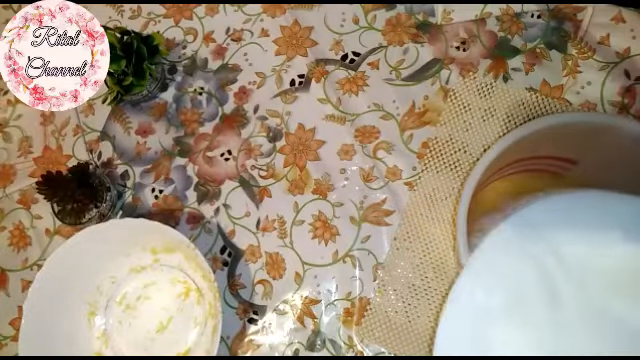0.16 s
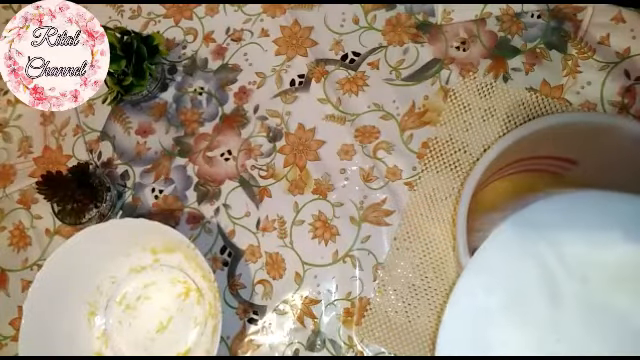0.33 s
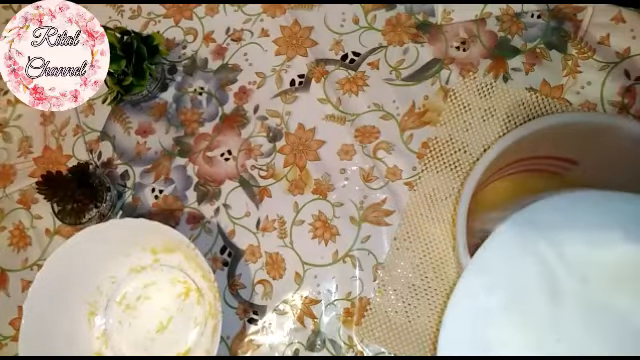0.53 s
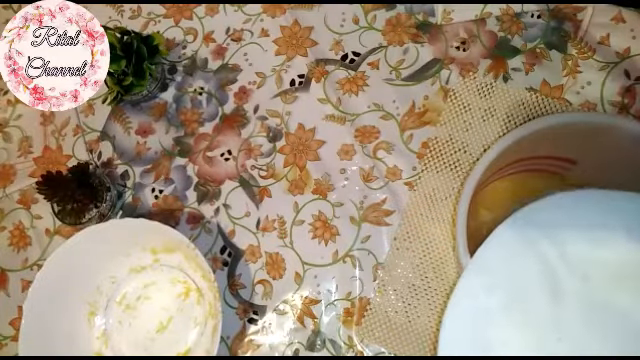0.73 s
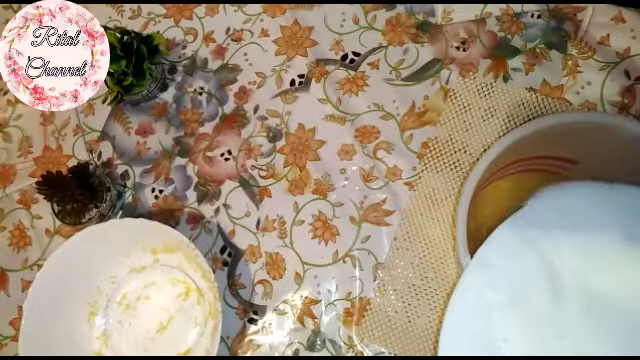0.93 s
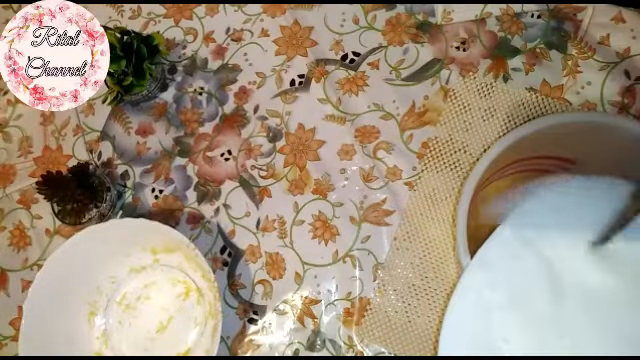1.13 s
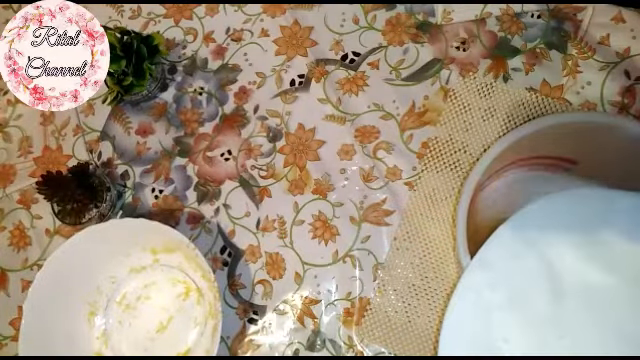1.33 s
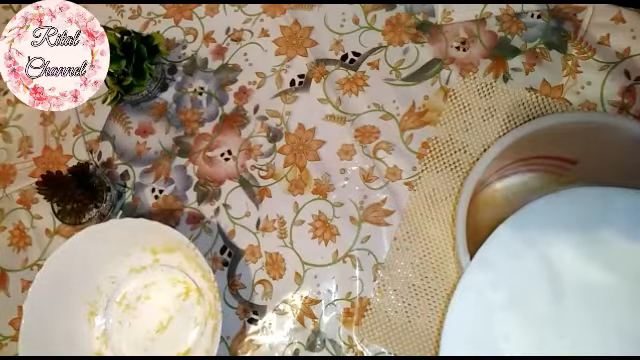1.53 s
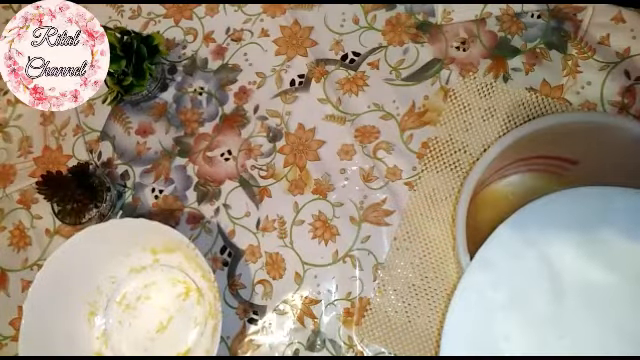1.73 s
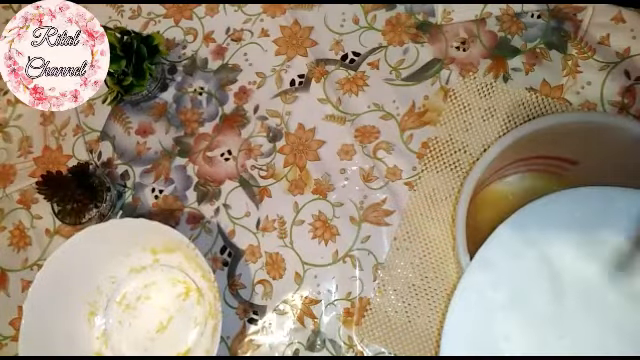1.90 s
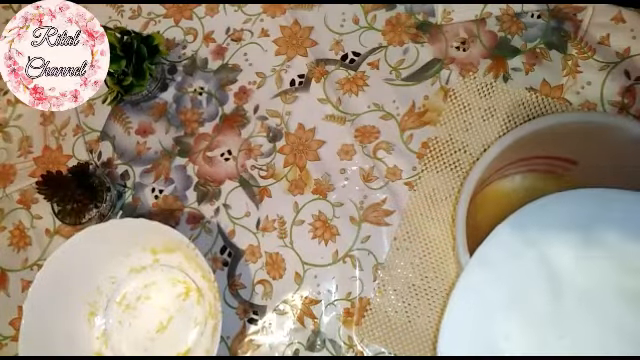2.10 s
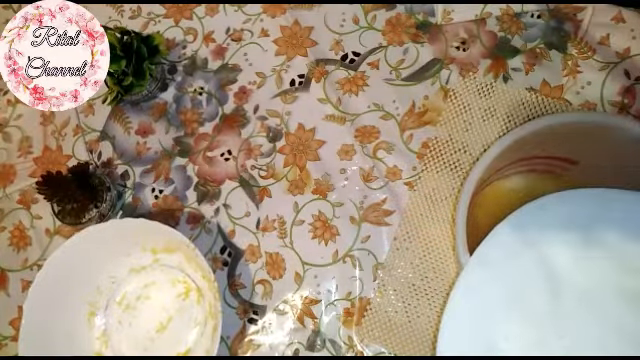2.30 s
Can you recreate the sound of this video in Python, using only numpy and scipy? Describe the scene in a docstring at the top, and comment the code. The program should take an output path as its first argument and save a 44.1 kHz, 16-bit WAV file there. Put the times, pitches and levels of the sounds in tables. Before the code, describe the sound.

Close stereo pickup of sugar sliding from a bowl into a plastic bucket: a thin bright hiss first, then fuller rushes with crunching clumps, low spoon knocks and scrapes, in a small room with very faint hum.

```python
"""A fine hiss of sugar opens the scene, sliding from a bowl into a plastic bucket near two microphones.
Coloured noise and random clicks make the hiss and the coarser rustle; clumps crunch as short bursts.
A spoon knocks and scrapes the bowl, whose wall rings low as a bank of decaying sines with room tails.
A wavering sine and filtered noise make a faint motor hum and room rumble; the hiss dies away near the end."""
import sys
import numpy as np
from scipy import signal
from scipy.fft import rfft, irfft
from scipy.io import wavfile
from scipy.ndimage import uniform_filter1d

SR = 44100
rng = np.random.default_rng(int(sys.argv[2]) if len(sys.argv) > 2 else 0)


def store_pcm(level_fs):
    """Save levels as 16-bit WAV."""
    pcm = np.round(np.clip(level_fs, -1, 1) * 32767).astype(np.int16)
    wavfile.write(sys.argv[1], SR, np.atleast_2d(pcm).T)


N = 103635  # samples, 2.35 s


def gain_of(db):
    """Decibels to amplitude gain; twice the decibels gives power."""
    return 10 ** (np.asarray(db) / 20)


def evened(x):
    """Scales to rms 1."""
    return x / np.sqrt(np.mean(x ** 2) + 1e-20)


def curve(rows, order=1):
    """One column of a time table, interpolated at every sample."""
    rows = np.array(rows)
    return np.interp(np.arange(N) / SR, rows[:, 0], rows[:, order])


def read(points, hz):
    """A spectrum table at the given frequencies, interpolated over log frequency."""
    f, value = np.transpose(points)
    return np.interp(np.log(hz + 1), np.log(f + 1), value)


# colour of the two microphones: (frequency [Hz], left minus right [dB])
MIC_COLOUR = [(2000, 1), (4000, 0.5), (6000, -0.5), (7200, -4.5), (8000, 9.5), (9000, 12.5), (11500, 6.5),
              (14000, 16)]


def coloured(x, spectrum, patchy_db=0.):
    """Gives a stereo pair a spectrum, the microphones' colours and drifting patches; rms 1."""
    hz, _, z = signal.stft(x, SR, nperseg=512)
    patches = rng.standard_normal(z.shape)
    for _ in range(2):
        patches = uniform_filter1d(patches, 5 if _ == 0 else 6, 1 if _ == 0 else 2)
    db = read(spectrum, hz) + np.outer([.5, -.5], read(MIC_COLOUR, hz))
    gain = gain_of(db[:, :, None] + patchy_db * evened(patches))
    return evened(signal.istft(z * gain, SR, nperseg=512)[1][:, :N])


RIGHT_LAG_S = 0.00019


def pair(a, b, same):
    """Left and right from two signals; the shared part reaches the right a little later."""
    same = np.clip(same, 0, 1)
    late = np.roll(a, round(RIGHT_LAG_S * SR))
    return np.array([a, same * late + np.sqrt(1 - same ** 2) * b])


def clicks(per_s, spread_db):
    """Sparse clicks of random sign, a few of them large; rms 1."""
    size = gain_of(spread_db * np.minimum(rng.exponential(1, N), 5))
    size = size * rng.choice([-1., 1.], N)
    return evened(size * (rng.random(N) < per_s / SR))


def add(mix, s, sound):
    """Mixes a sound in at a time in seconds."""
    part = mix[..., round(s * SR):][..., :sound.shape[-1]]
    part += sound[..., :part.shape[-1]]


GRAIN_SHARE, GRAIN_SAME = .25, .5  # power in separate grains; their left-right likeness
FLICKER_DB = 1.33  # rms


def grains(same, hits):
    """A dense wash with separate grains on top, flickering as the stream bunches."""
    a, b = np.sqrt(1 - GRAIN_SHARE) * rng.standard_normal((2, N))
    flicker = rng.standard_normal(N)
    for _ in range(2):
        flicker = uniform_filter1d(flicker, size=150)
    mixed = pair(a, b, same) + np.sqrt(GRAIN_SHARE) * pair(*hits, GRAIN_SAME)
    return mixed * gain_of(FLICKER_DB * evened(flicker))


# sugar flow: (time [s], fine hiss level [dB], lower rustle level [dB])
FLOW_LEVELS = [(0, -49.5, -68.5), (.05, -53.5, -65.5), (.28, -47.5, -53.5), (.44, -47, -57),
               (.56, -49, -57.5), (.64, -57, -67.5), (.7, -55, -69), (.86, -53.5, -76.5),
               (.9, -47.5, -54.5), (.96, -55, -67.5), (1.06, -54.5, -60), (1.14, -48.5, -62),
               (1.22, -43.5, -46.5), (1.3, -47, -59), (1.4, -38.5, -53.5), (1.47, -39, -52),
               (1.55, -53.5, -64), (1.62, -51.5, -66), (1.67, -49.5, -56.5), (1.735, -69, -71),
               (1.75, -51, -53.5), (1.83, -54, -65), (1.86, -48.5, -52), (1.96, -63.5, -71),
               (1.98, -52.5, -59.5), (2.065, -50.5, -55.5), (2.11, -71, -74), (2.26, -93, -98),
               (2.32, -88, -91.5), (2.324, -71, -93)]
# colour of the fine hiss: (frequency [Hz], relative level [dB])
HISS_COLOUR = [(2600, -70), (3500, -40), (4270, -30.5), (6110, -13), (6920, 0.5), (8650, 3), (10200, -7),
               (14000, -17), (14400, -60.5)]
# colour of the lower rustle: (frequency [Hz], relative level [dB])
RUSTLE_COLOUR = [(1100, -57.5), (1600, -11.5), (2050, -3.5), (2860, -2), (3680, -7.5), (4270, -6),
                 (5600, -3.5), (6500, -2), (8450, -56)]
GRAINS_PER_S, GRAIN_SPREAD_DB, PATCHY_DB = 2500, 3.5, 2
HISS_SAME, RUSTLE_SAME = 0.05, 0.19  # left-right likeness of each wash


def sugar():
    """The stream: the same grains heard as fine hiss, lower rustle and coarse sliding."""
    hits = [clicks(GRAINS_PER_S, GRAIN_SPREAD_DB) for _ in "lr"]
    fine = coloured(grains(HISS_SAME, hits), HISS_COLOUR, PATCHY_DB)
    low = coloured(grains(RUSTLE_SAME, hits), RUSTLE_COLOUR, PATCHY_DB)
    fine_power = gain_of(2 * curve(FLOW_LEVELS))
    low_power = gain_of(2 * curve(FLOW_LEVELS, order=2))
    add_crunches(fine_power, low_power)
    return fine * np.sqrt(fine_power) + low * np.sqrt(low_power) + coarse_slide(hits)


# crunching clumps: (time [s], hiss level [dB], rustle relative to hiss [dB], decay t60 [s])
CLUMPS = [(0.6629, -47.5, -4.5, 0.033), (0.72, -44.5, -23, 0.048), (0.8757, -44, -3.5, 0.023),
          (0.8941, -31, -17, 0.036), (1.034, -35.5, -7, 0.023), (1.1683, -36.5, -37, 0.06),
          (1.2006, -40, 0, 0.021), (1.2205, -33, 3, 0.0079), (1.5715, -30, -42, 0.019),
          (1.6381, -37, -3.5, 0.039), (1.686, -36, -7.5, 0.013), (1.7466, -28.5, -13.5, 0.014),
          (1.779, -38.5, -13, 0.04), (1.9718, -46.5, -4.5, 0.059)]
CRUNCH_RISE_S = .0012


def add_crunches(fine_power, low_power):
    """Clumps crunch: short bursts of power swell the hiss and the rustle, then die away."""
    t = np.arange(6000) / SR
    for s, db, low_db, t60 in CLUMPS:
        burst = np.minimum(t / CRUNCH_RISE_S, 1) * gain_of(2 * (db - 60 * t / t60))
        add(fine_power, s, burst)
        add(low_power, s, burst * gain_of(2 * low_db))


# colour of coarse sliding on the wall: (frequency [Hz], relative level [dB])
ROUGH_COLOUR = [(800, -49.5), (1200, 6), (1600, 2.5), (2050, 9.5), (2600, -7.5), (3100, -34.5)]
# coarse sliding: (time [s], level [dB])
SLIDE_LEVELS = [(1.15, -89), (1.22, -54), (1.32, -68.5), (1.42, -51.5), (1.52, -59), (1.62, -77.5),
                (1.78, -65.5), (1.95, -82), (2.0, -51), (2.075, -56), (2.1, -69.5), (2.26, -97)]


def coarse_slide(hits):
    """Coarse sliding on the wall: the grain noise in a narrower, lower colour."""
    rough = coloured(grains(RUSTLE_SAME, hits), ROUGH_COLOUR, PATCHY_DB)
    return rough * gain_of(curve(SLIDE_LEVELS))


# single lump landing: (time [s], level [dB], frequency [Hz])
LUMPS = [(0.2873, -32.5, 2230)]
TICK_S = 0.00029  # standard deviation of the bell


def ticks():
    """A lump landing: a very short tone under a bell-shaped envelope."""
    out, t = np.zeros(N), np.arange(-100, 100) / SR
    for s, db, hz in LUMPS:
        bell = np.exp(-.5 * (t / TICK_S) ** 2)
        add(out, s + t[0], gain_of(db) * bell * np.cos(2 * np.pi * hz * t))
    return out


# bowl wall modes, before a strike shifts and shapes them:
# (frequency at main mode 404 Hz [Hz], relative level [dB], t60 at length factor 1 [s])
WALL_MODES = [(270, -13, .07), (325, -8, .09), (403, 0, .2), (455, -12, .09), (550, -7, .13),
              (612, -5, .12), (690, -10, .14), (765, -18, .12), (900, -22, .1), (1040, -13, .08),
              (1078, -10, .11), (1225, -16, .14)]
MAIN_HZ, MIDDLE_FROM_HZ, UPPER_FROM_HZ = 404, 500, 850
THUD_DB, THUD_SHORTER = 5, 0.23  # each mode starts with a quickly damped surplus
KNOCK_RISE_S = .002


def ring(main_hz, middle_db, upper_db, length, scatter_db):
    """The bowl wall struck once: grip and load shift its pitch and favour some modes."""
    hz, db, t60 = np.transpose(WALL_MODES)[:, :, None]
    t = np.arange(8000) / SR
    balance_db = np.where(hz > UPPER_FROM_HZ, upper_db, middle_db * (hz > MIDDLE_FROM_HZ))
    level = gain_of(db + balance_db + scatter_db[:, None])
    fall = gain_of(-60 * t / (t60 * length))
    thud = gain_of(THUD_DB - 60 * t / (t60 * THUD_SHORTER))
    rise = np.sin(np.pi / 2 * np.minimum(t / KNOCK_RISE_S, 1)) ** 2
    modes = np.sin(2 * np.pi * hz * main_hz / MAIN_HZ * t)
    return rise * (level * (fall + thud) * modes).sum(0)


# knocks on the bowl: (time [s], level [dB], main mode [Hz], middle modes [dB], upper modes [dB],
# ring length [factor])
BOWL_KNOCKS = [(0.72, -47.5, 435, -4, 3.5, 0.31), (.792, -53.5, 332, -10, -10, 0.57),
               (.815, -53.5, 433, -10, -10, 0.34), (.867, -56.5, 400, -13, -10, 0.41),
               (.879, -44, 398, 1, 0, 0.1), (.896, -51, 428.5, -23, 4, 0.77),
               (.99, -50, 427, -16, -4, 0.23), (1.027, -55.5, 408, -10, -7, 1),
               (1.034, -40, 398.4, -0.5, -5, 0.9), (1.051, -48.5, 401, -14, -21, 0.45),
               (1.089, -51, 390.6, -21, -31, 0.88), (1.181, -47, 425, -1, -6, 0.31),
               (1.194, -40.5, 405.6, -11, -7.5, 1), (1.221, -49.5, 398, 8, 6, 0.89),
               (1.638, -30, 402, 1.5, 3.5, 0.26), (1.685, -41, 415, -9, 0.5, 0.17),
               (1.745, -54.5, 419, 6.5, 11, 0.66), (1.77, -65, 403, 8, 11, 0.63),
               (1.896, -70, 408, 11.5, 22, 0.76), (1.973, -51.5, 455, -1, 11.5, 0.47)]
SCATTER_DB = 2.5  # chance difference of each mode at each knock


def knocks():
    """Spoon knocks: each strike rings the wall with its own pitch, balance and length."""
    out = np.zeros(N)
    chance = rng.standard_normal((len(BOWL_KNOCKS), len(WALL_MODES)))
    for (s, db, *colour), draw in zip(BOWL_KNOCKS, chance):
        add(out, s, gain_of(db) * ring(*colour, SCATTER_DB * draw))
    return out


# spoon dragging on the wall: (time [s], level [dB])
SCRAPE_LEVELS = [(.7, -120), (.74, -68.5), (.85, -65), (.9, -52), (.96, -62), (1.09, -66), (1.16, -70),
                 (1.24, -54.5), (1.36, -69.5), (1.45, -87), (1.62, -99), (1.67, -52.5), (1.735, -61),
                 (1.78, -54), (1.87, -69), (1.95, -81), (2.0, -56.5), (2.07, -70.5), (2.14, -105.5)]
SLIPS_PER_S, SLIP_SPREAD_DB = 470, 2
SLIP_MIDDLE_DB, SLIP_UPPER_DB, SLIP_LENGTH = 3, 6.5, 0.28  # balance and ring length factor


def scrape():
    """The dragging spoon: a train of small random slips, each ringing the same wall briefly."""
    slips = clicks(SLIPS_PER_S, SLIP_SPREAD_DB) * gain_of(curve(SCRAPE_LEVELS))
    slip = ring(MAIN_HZ, SLIP_MIDDLE_DB, SLIP_UPPER_DB, SLIP_LENGTH, np.zeros(len(WALL_MODES)))
    return signal.oaconvolve(slips, slip / np.linalg.norm(slip))[:N]


WALL_FLOOR_HZ = 248


def bowl():
    """Knocks and scrape on one wall, high-passed below its lowest mode."""
    floor = signal.butter(4, WALL_FLOOR_HZ, "high", fs=SR, output="sos")
    return signal.sosfilt(floor, knocks() + scrape())


ROOM_T60_S, TURNS_PER_S = .2, 3.1


def room(x):
    """Short tails of random reflections, different at each microphone; three sets fade in and out in turn at
    3.1 Hz."""
    t = np.arange(round(.3 * SR)) / SR
    fall = gain_of(-60 * t / ROOM_T60_S) * (t > .003)  # first reflection after 3 ms
    tails = rng.standard_normal((3, 2, len(t))) * fall
    turn = 2 * np.pi * TURNS_PER_S * np.arange(N) / SR
    out = np.zeros((2, N))
    for k, tail in enumerate(tails):  # three tails weighted in rotation, steady total power
        part = x * np.sqrt(2 / 3) * np.cos(turn + 2 * np.pi * k / 3)
        out += signal.fftconvolve(part[None], tail / np.linalg.norm(tail[0]), axes=1)[:, :N]
    return out


# motor hum: (time [s], level [dB])
HUM_LEVELS = [(0, -73.5), (.47, -68.5), (.74, -77.5), (.85, -72), (1.3, -75.5), (1.7, -76.5), (2.0, -77),
              (2.35, -89)]
HUM_HZ, HUM_WIDTH_HZ, HUM_WAVER = 95.9, 5, 1.0  # waver: rms phase [rad]


def hum():
    """A motor tone: a sine whose phase wavers with slow random drift."""
    r = np.exp(-np.pi * HUM_WIDTH_HZ / SR)
    drift = rng.standard_normal(N)
    for _ in range(2):
        drift = signal.lfilter([1], [1, -r], drift)
    phase = 2 * np.pi * HUM_HZ * np.arange(N) / SR + HUM_WAVER * evened(drift)
    return np.sqrt(2) * np.sin(phase) * gain_of(curve(HUM_LEVELS))


# colour of the room rumble: (frequency [Hz], relative level [dB])
RUMBLE_COLOUR = [(20, -13.5), (60, -12), (80, -5.5), (150, -1), (200, -12.5), (350, -15.5), (950, -26),
                 (1500, -15.5), (2500, -49.5)]
# room rumble: (time [s], level [dB])
RUMBLE_LEVELS = [(0, -78), (1.95, -75.5), (2.0, -55.5), (2.1, -79), (2.35, -95.5)]
RUMBLE_SAME = .6  # left-right likeness


def rumble():
    """Low room rumble: partly shared noise shaped in frequency, following its own level curve."""
    colour = gain_of(read(RUMBLE_COLOUR, np.fft.rfftfreq(N, 1 / SR)))
    noise = pair(*rng.standard_normal((2, N)), RUMBLE_SAME)
    return evened(irfft(rfft(noise) * colour, N)) * gain_of(curve(RUMBLE_LEVELS))


BOWL_LEFT_DB, LUMP_SAME, ROOM_DB = 4, 0.34, -10.5  # left minus right; likeness; room level


def scene():
    """Sugar in front, the bowl and lump with their room tails, hum and rumble beneath."""
    wall, lumps = bowl(), ticks()
    near = pair(wall, wall, 1) * gain_of([[BOWL_LEFT_DB / 2], [-BOWL_LEFT_DB / 2]])
    landing = pair(lumps, lumps, LUMP_SAME)
    tails = gain_of(ROOM_DB) * room(wall + lumps)
    return sugar() + near + landing + tails + hum() + rumble()


def record(dry):
    """Band limit of the recorder: a steep low-pass at 15.5 kHz."""
    low_pass = signal.firwin(511, 15500, window=("kaiser", 9), fs=SR)
    return signal.oaconvolve(dry, low_pass[None], "same")


dry = scene()
out = record(dry)
store_pcm(out)
```